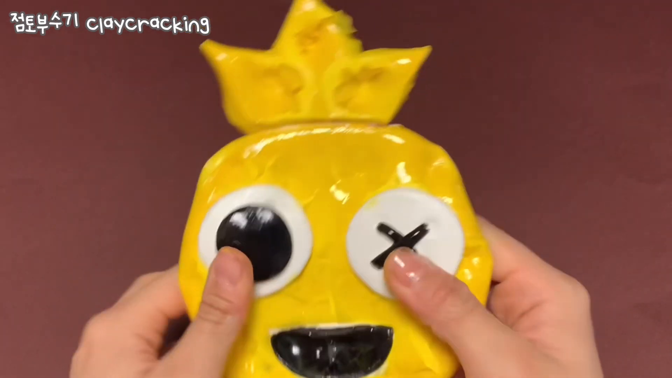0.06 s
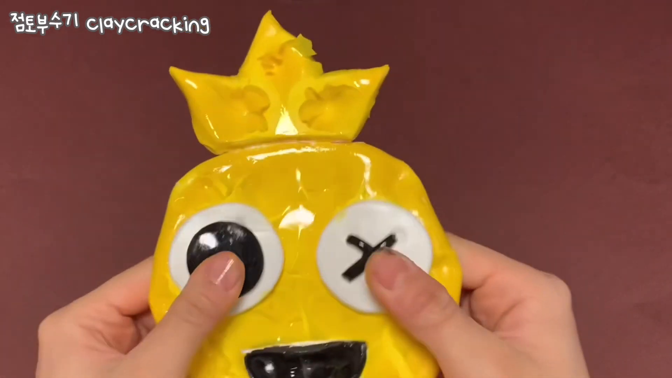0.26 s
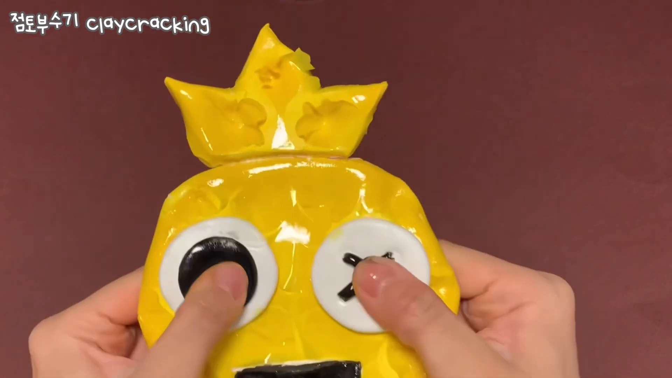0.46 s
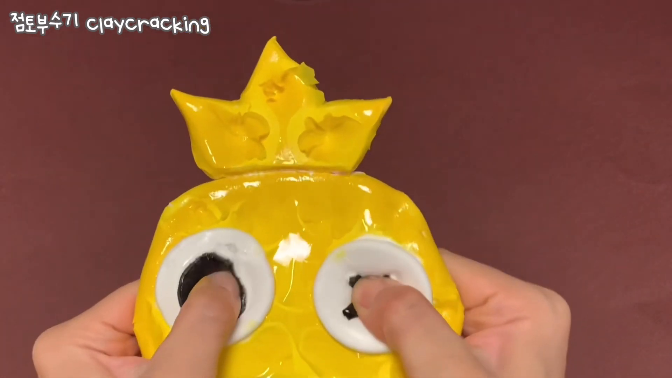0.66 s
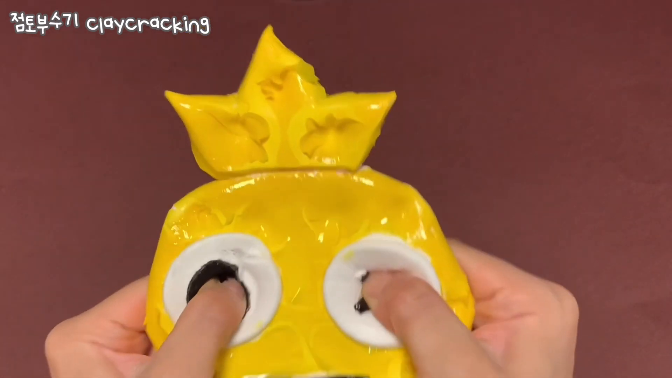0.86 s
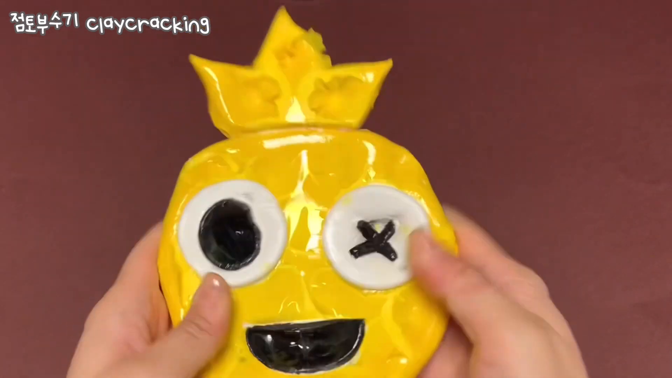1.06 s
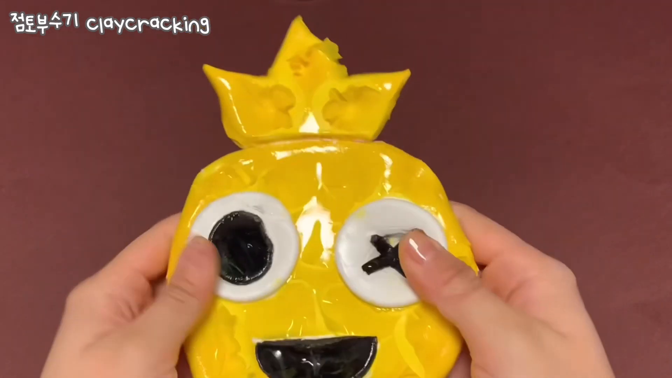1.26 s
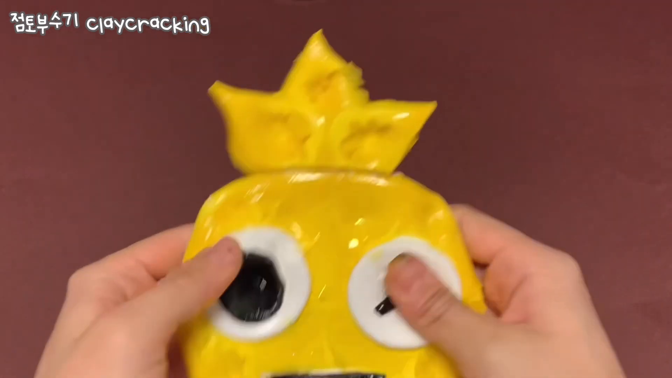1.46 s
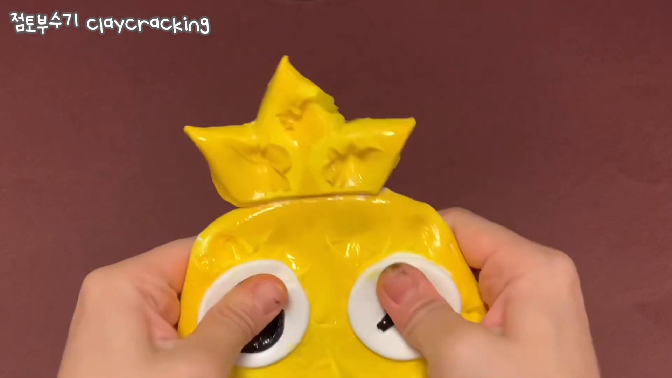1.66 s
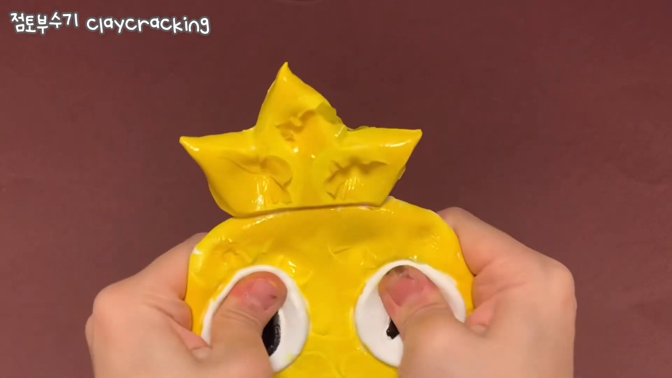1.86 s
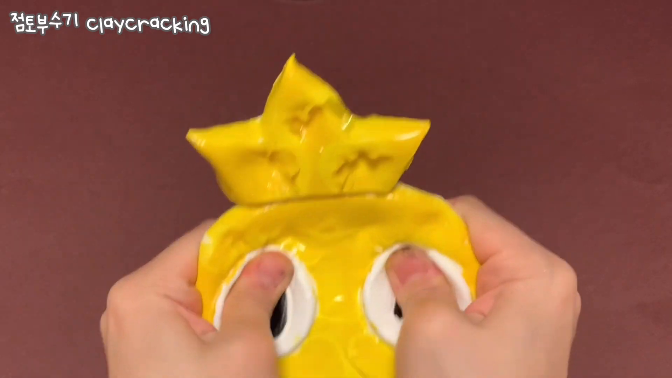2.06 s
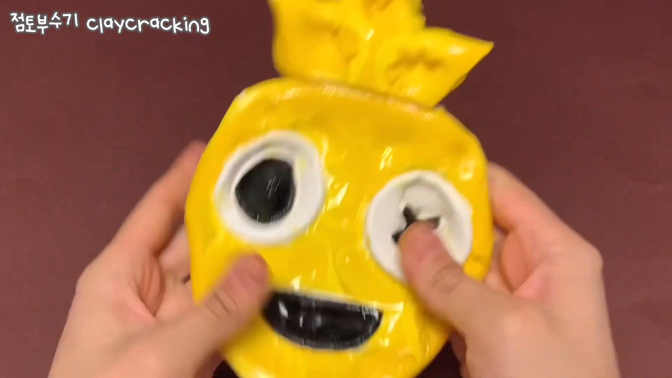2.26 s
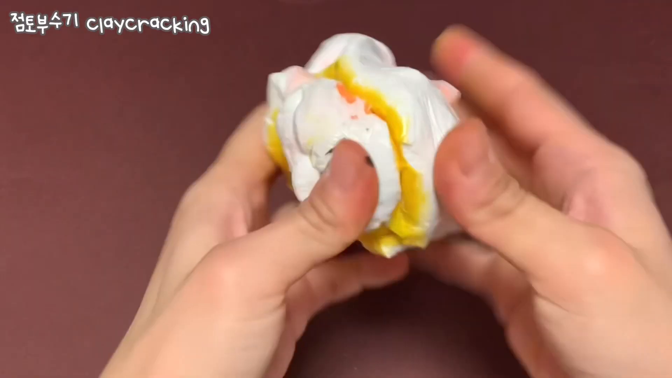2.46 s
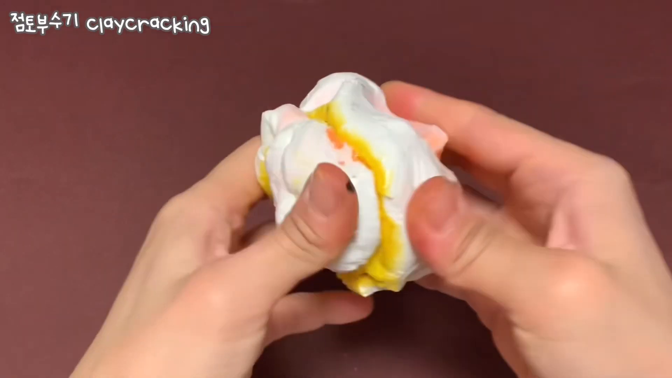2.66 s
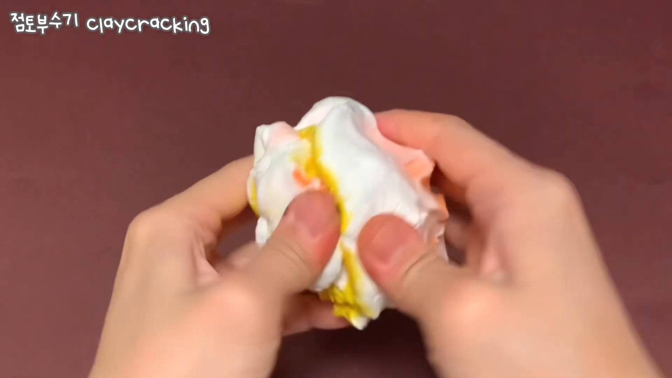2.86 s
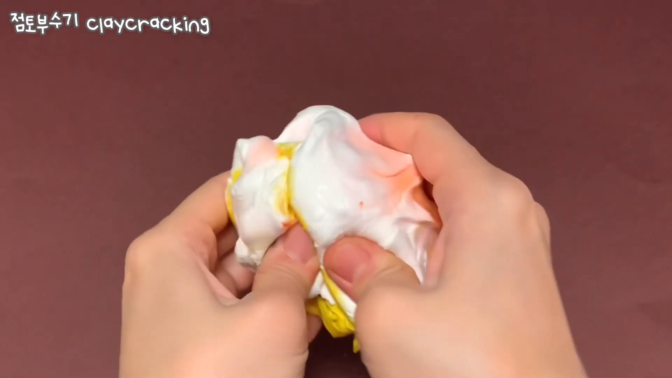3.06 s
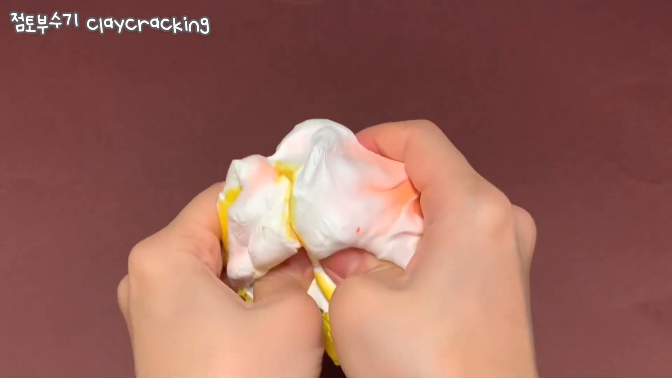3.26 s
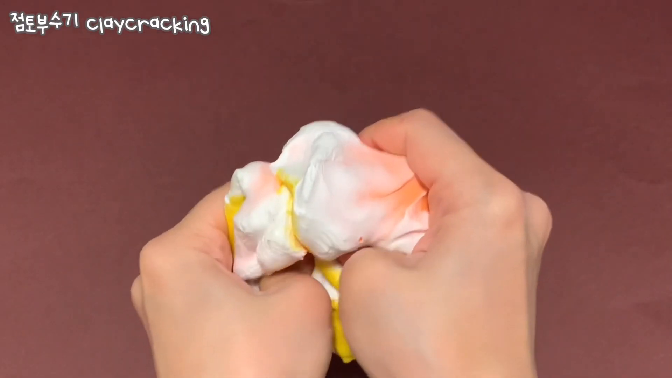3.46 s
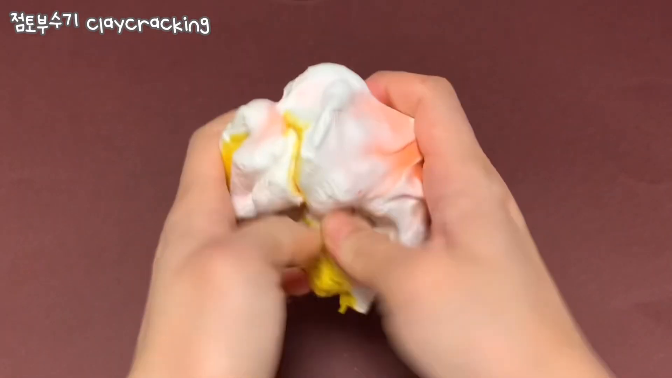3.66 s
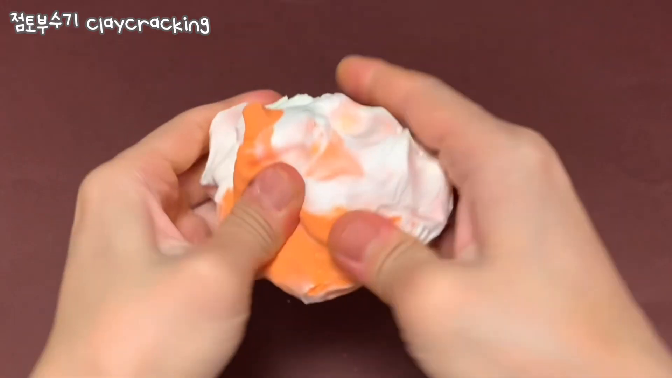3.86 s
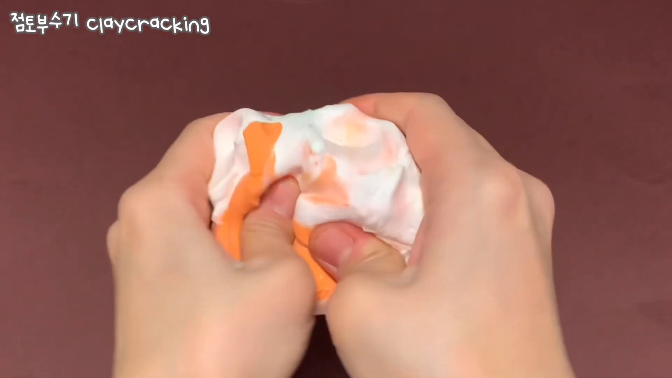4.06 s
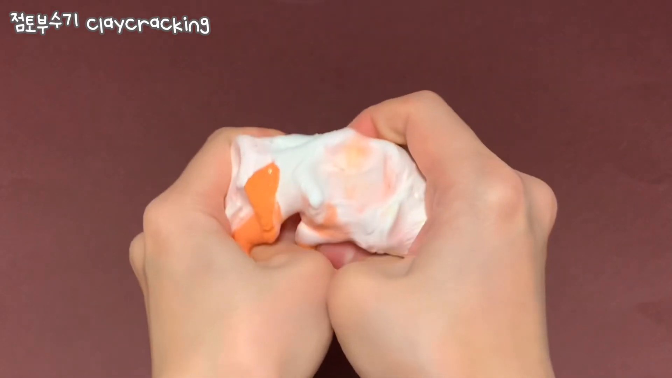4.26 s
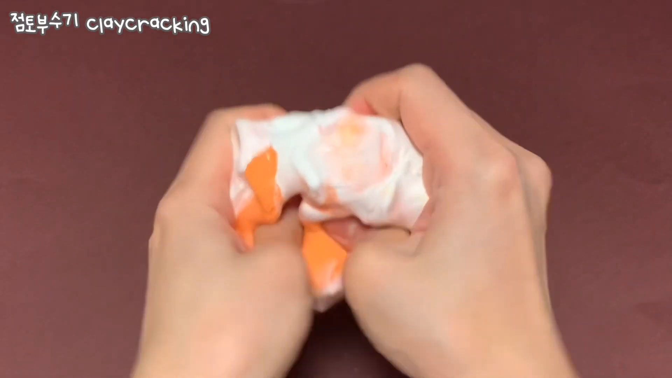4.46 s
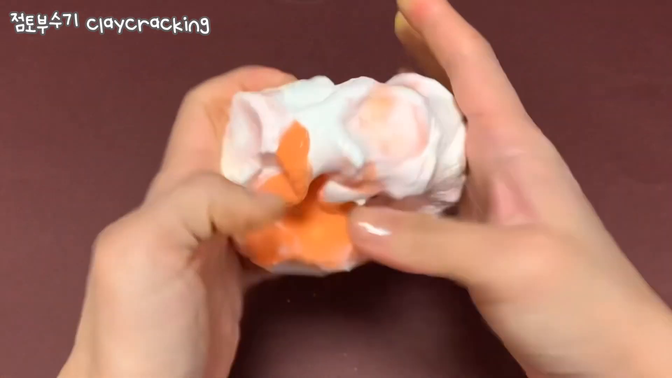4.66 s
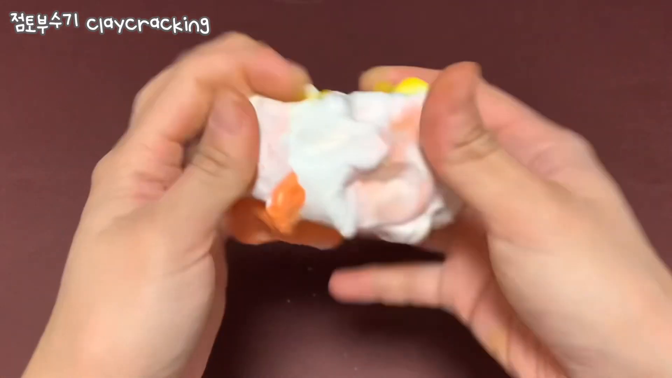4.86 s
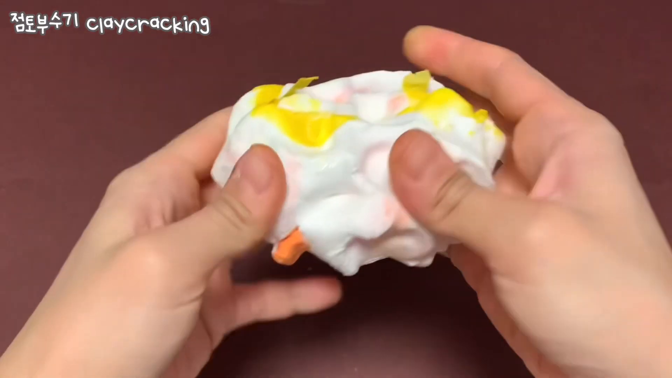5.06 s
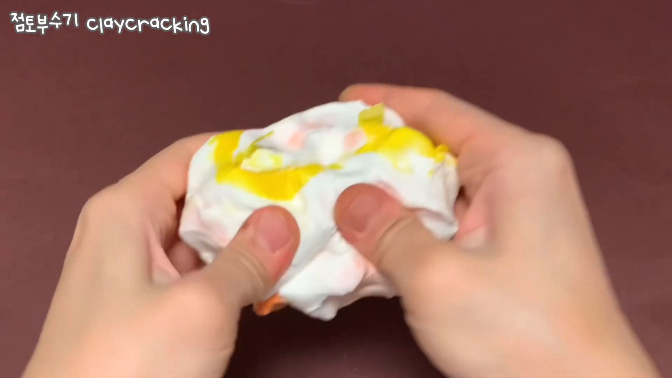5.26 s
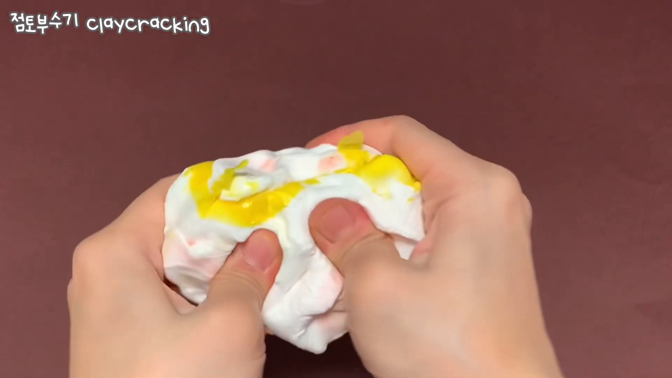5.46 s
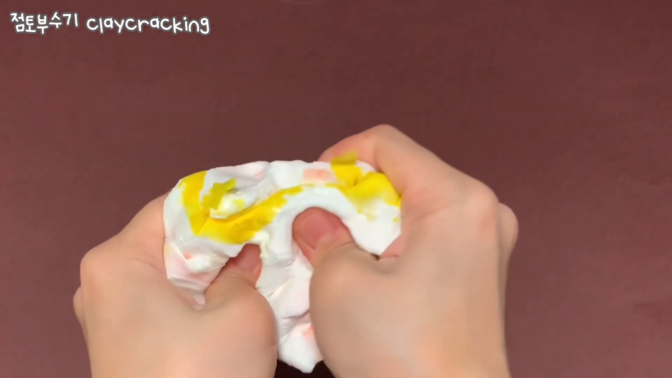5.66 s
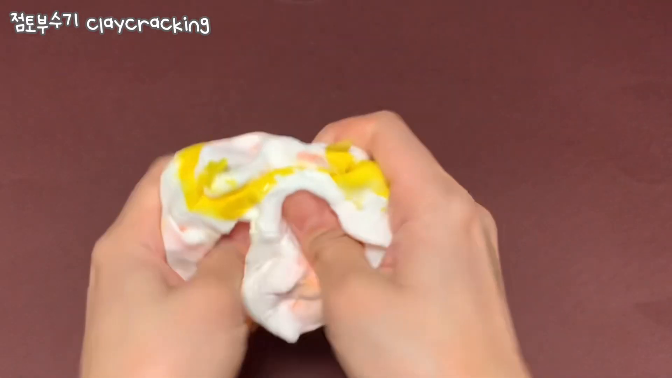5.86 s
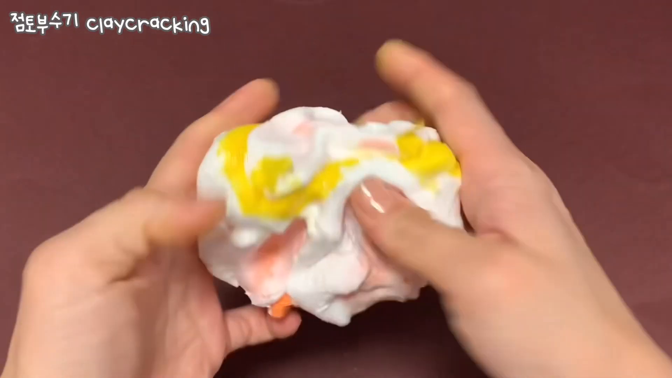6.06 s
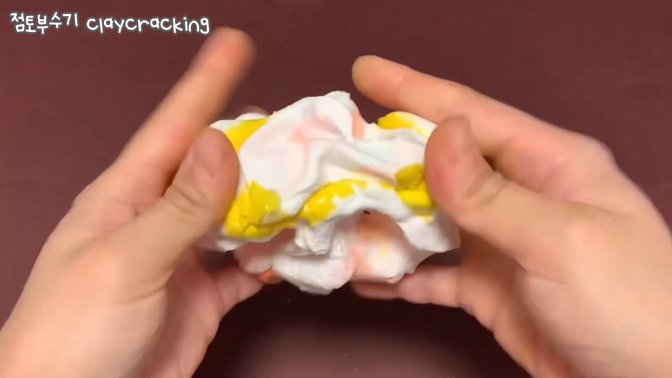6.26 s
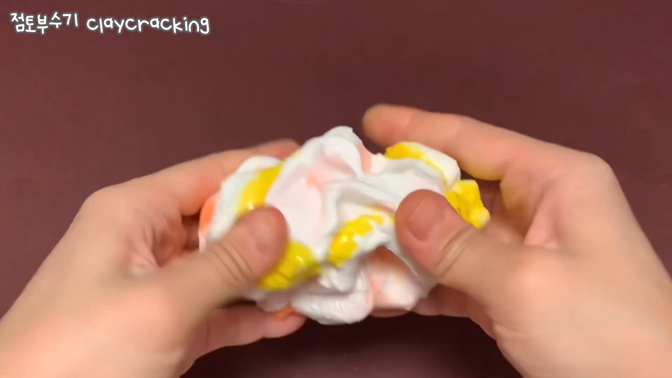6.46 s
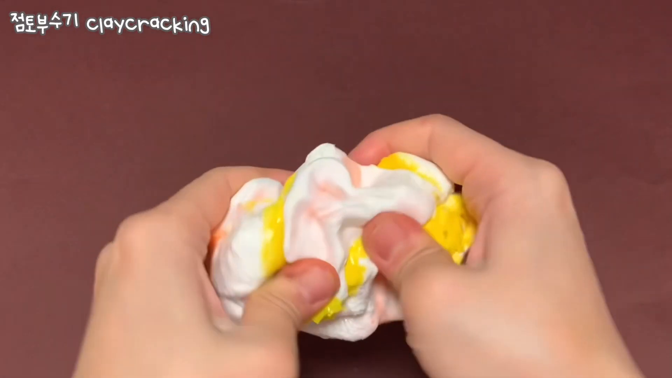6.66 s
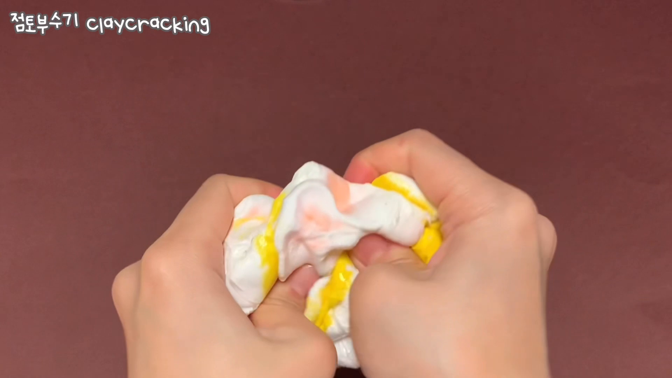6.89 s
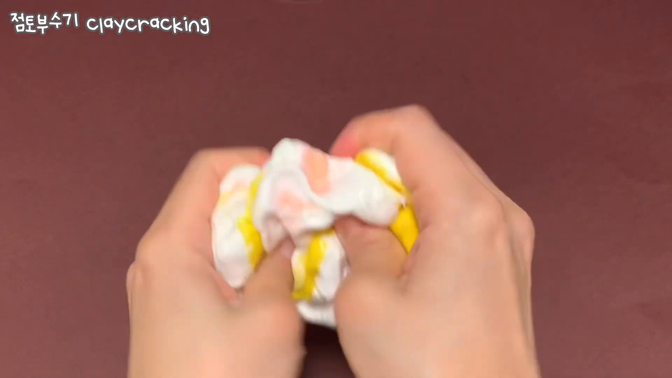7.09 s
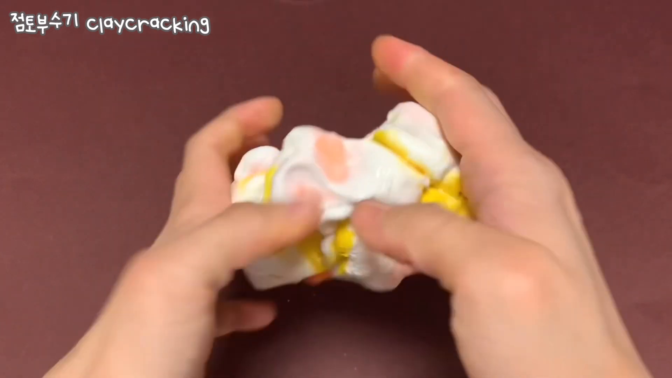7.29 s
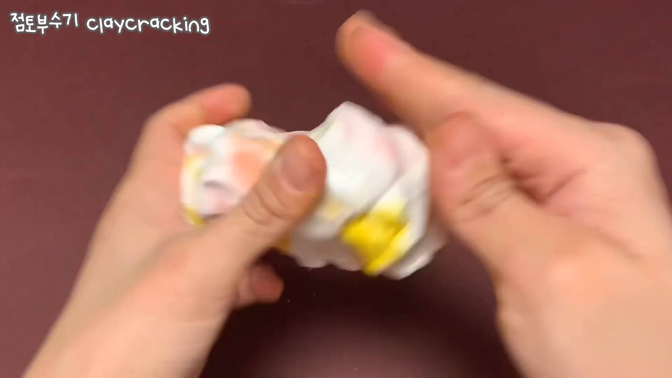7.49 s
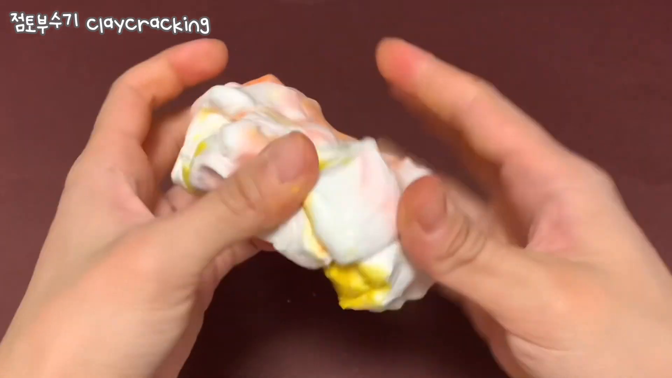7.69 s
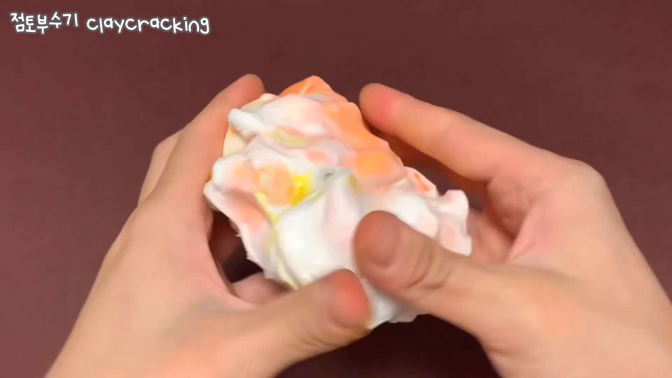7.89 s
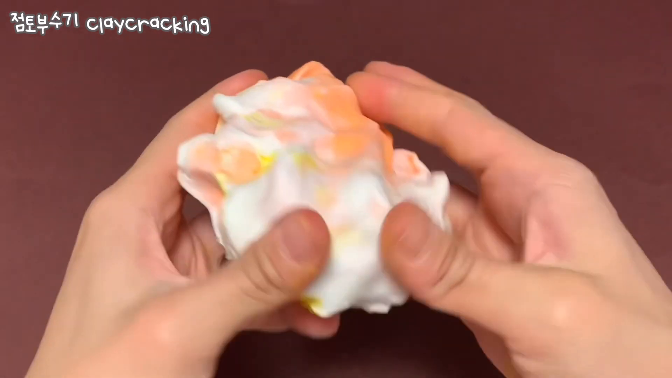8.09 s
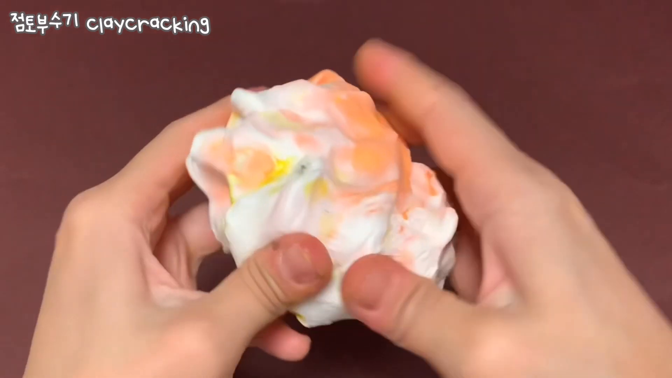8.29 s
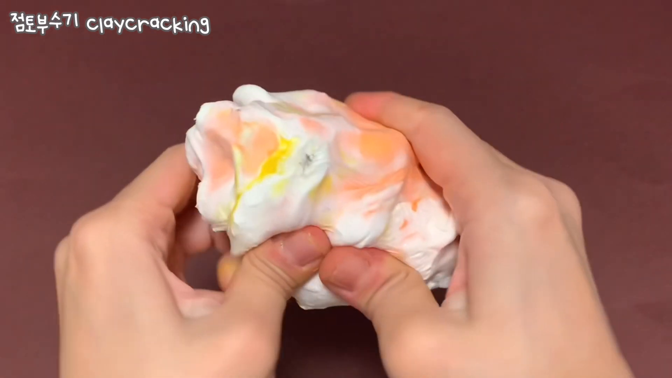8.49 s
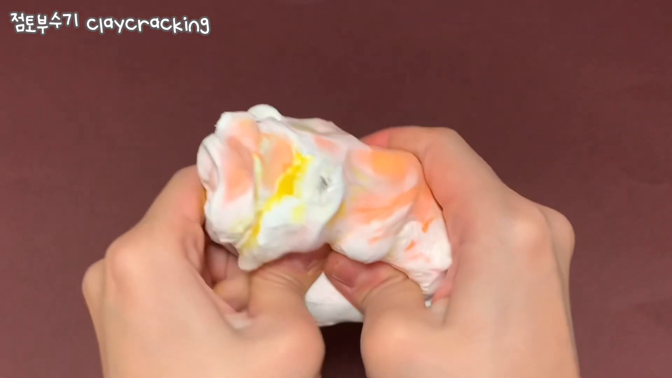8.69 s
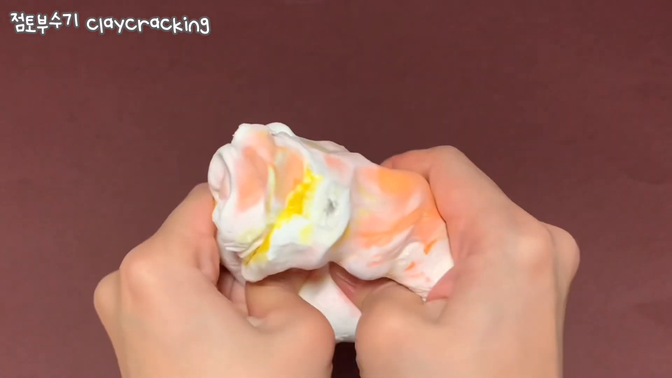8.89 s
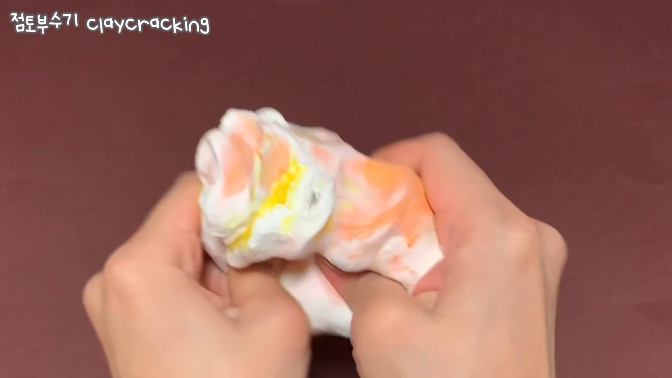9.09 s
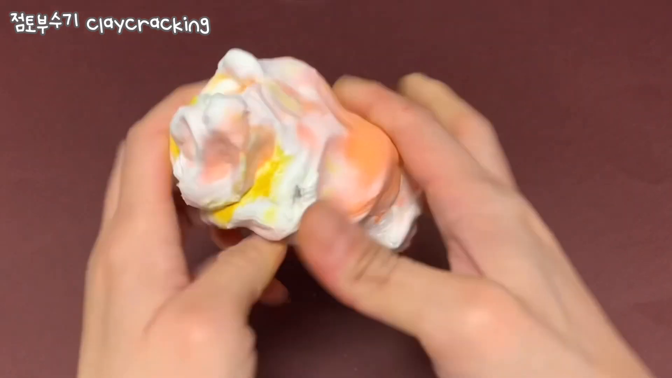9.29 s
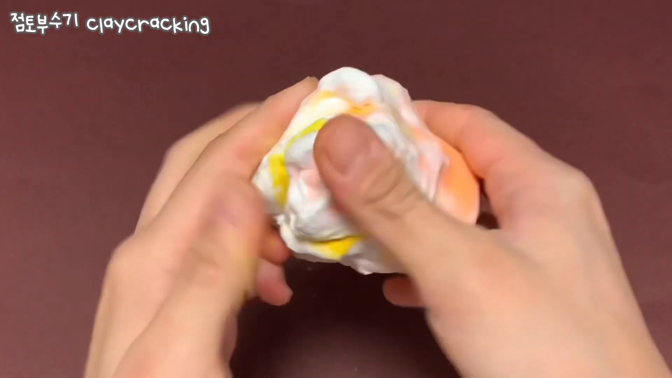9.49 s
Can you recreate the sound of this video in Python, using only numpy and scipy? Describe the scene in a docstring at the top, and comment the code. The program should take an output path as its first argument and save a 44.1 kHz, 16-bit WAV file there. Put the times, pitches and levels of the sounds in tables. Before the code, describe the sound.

Hands squeeze a lump of soft clay with a brittle dried skin, close to the microphone in a small, quiet room. Loud, sharp cracks over dense fine crackling come from about 0.4 to 1.1 seconds, and again from 1.7 until breaking off at 2.4, with soft finger bumps. A longer, heavier crunch runs from 2.8 seconds and cuts off at 3.7, the soft core squashing with a low rumble beneath it. More bursts follow around 4.1 and 4.5 seconds, then from 5.4 to 6.1. Light ticks lead to a short, strong crunch at 7.1 seconds, followed by a near-silent pause until about 8.1. A final run of snapping and crackling builds from 8.4 to 9.3 seconds and fades to faint ticks. The loudest cracks overload slightly, and each has a short room reflection.

```python
"""Squeezing crusted clay

Close microphone, small room: hands squeeze a lump of soft clay with a dried, brittle skin. The skin snaps
in loud cracks over a dense fine crackle, the soft core squashes with a low rumble, fingers bump the lump
and the walls answer. Twice the sound dips and breaks off. The loudest cracks overload the recorder."""
import sys
import numpy as np
from scipy import signal
from scipy.fft import rfft, irfft, next_fast_len
from scipy.io import wavfile
from scipy.ndimage import map_coordinates

SR = 44100
rng = np.random.default_rng(int(sys.argv[2]) if len(sys.argv) > 2 else 0)


def generate_wav(signal):
    """Clip the signal to [-1, 1] and save it as 16-bit WAV at the path in sys.argv[1]."""
    frames = np.transpose(np.atleast_2d(signal))
    scaled = np.clip(frames, -1, 1) * 32767
    pcm = np.round(scaled).astype(np.int16)
    wavfile.write(sys.argv[1], SR, pcm)


N = 420713

# Single breaks of the skin: t/s, level/dB, ring f/Hz
SKIN_CRACKS = [(0.1351, -28.5, 3300), (0.421, -19.5, 7080), (0.4423, 7.5, 4200), (0.454, 1.5, 2896),
               (0.479, 7, 7550), (0.4872, 2.5, 4370), (0.5045, 5.5, 5160), (0.5361, 9.5, 4560),
               (0.5628, 5, 2890), (0.5678, 10, 2560), (0.615, 7.5, 7600), (0.6838, 5, 7240),
               (0.6862, 4.5, 5060), (0.7178, 7.5, 5300), (0.9293, -7.5, 2350), (0.9627, -4.5, 2470),
               (0.986, 4.5, 3020), (0.99, 9, 2600), (1.017, -8, 3000), (1.0277, 9.5, 2650),
               (1.0642, -4.5, 3020), (1.105, -6, 2760), (1.235, -25, 2070), (1.706, -7, 3670),
               (1.751, -6.5, 4160), (1.7684, 9.5, 4930), (1.7803, 4.5, 5200), (1.7995, 4.5, 2430),
               (1.828, 0.5, 5110), (1.8347, 5, 2820), (1.842, 5, 7360), (1.851, 1.5, 2705),
               (1.8588, 12.5, 4260), (1.862, 1, 2460), (1.8844, 8.5, 2260), (1.897, 7, 3045),
               (1.924, 5.5, 3530), (1.9485, 9.5, 3320), (1.9548, -2.5, 3030), (2.088, -13, 3200),
               (2.108, 3.5, 4270), (2.128, -2.5, 2920), (2.143, 7, 4180), (2.1575, 3, 4160),
               (2.2143, -4, 6650), (2.2728, -0.5, 2830), (2.2883, -2, 2030), (2.3295, -6.5, 3430),
               (2.3518, -2, 2110), (2.539, -28, 1850), (2.7728, -14, 4160), (2.8154, -7.5, 4130),
               (2.9218, 13, 3050), (2.9795, 9.5, 8180), (2.9827, 4, 4290), (2.9999, 7, 6270),
               (3.021, 4.5, 7000), (3.0807, 4.5, 1850), (3.1157, 3, 4000), (3.1648, -9.5, 6740),
               (3.1768, -10.5, 2208), (3.1916, 0.5, 7760), (3.2292, 1.5, 5330), (3.2331, 3.5, 2700),
               (3.2569, 12, 3900), (3.303, 7, 3150), (3.328, 6, 6600), (3.341, -3.5, 8900),
               (3.387, -1, 6400), (3.511, -9.5, 9710), (3.526, 6.5, 2610), (3.5523, 9.5, 3880),
               (3.585, 11.5, 5400), (3.604, 9.5, 2590), (3.6312, 4.5, 4110), (3.636, 8, 3380),
               (3.664, 11.5, 9100), (3.8535, -10, 8460), (3.869, 1.5, 4100), (3.9092, -9, 4280),
               (3.958, -7, 4360), (3.9775, -21.5, 4150), (4.0334, 0.5, 5700), (4.0366, 0.5, 7160),
               (4.0497, 7, 3570), (4.0705, -1, 3960), (4.105, -11.5, 4170), (4.127, 3, 9250),
               (4.134, 0.5, 4610), (4.149, 5.5, 3500), (4.1648, 3.5, 7500), (4.1854, -1, 3900),
               (4.2081, -3.5, 3500), (4.2334, -1, 3600), (4.287, -5, 4800), (4.3868, -18, 10160),
               (4.4842, 3.5, 1380), (4.5841, -1, 1460), (4.7376, -9, 3060), (4.982, -26, 2010),
               (5.208, -19, 3080), (5.268, -25, 3110), (5.4186, -9, 4340), (5.4404, -13, 4130),
               (5.4556, 2.5, 4320), (5.4873, -5, 3070), (5.492, -4.5, 3150), (5.5066, 4, 7900),
               (5.515, -0.5, 3930), (5.5765, 7, 4170), (5.597, 10, 3380), (5.6603, -7.5, 7600),
               (5.7776, -10, 7360), (5.8448, 7, 4010), (5.8504, -2, 4800), (5.905, 9, 1260),
               (5.9144, 13, 3870), (5.9346, 7, 4030), (6.0257, 8.5, 2400), (6.1653, -9.5, 1900),
               (6.22, -18, 2500), (6.44, -20, 3080), (6.504, -20, 4680), (6.5717, -24, 3700),
               (6.6547, -11, 5200), (6.798, -7, 3800), (6.907, -12, 5140), (7.088, -5, 4180),
               (7.114, 8.5, 3870), (7.119, 10, 2880), (7.1521, 0, 1620), (7.1822, 1.5, 5640),
               (7.1957, 4.5, 2480), (7.579, -29, 1446), (7.96, -26, 1587), (8.144, -11.5, 4200),
               (8.2685, -14, 2010), (8.3544, -10.5, 4730), (8.3593, -6, 8700), (8.406, -13, 4260),
               (8.4587, -1, 4070), (8.5097, -3.5, 4400), (8.5189, -4.5, 4500), (8.525, 5, 4300),
               (8.5344, 0.5, 4300), (8.6103, 8.5, 4200), (8.6342, 0, 4500), (8.6434, 2, 9100),
               (8.659, 7.5, 5230), (8.6761, 7.5, 6600), (8.727, -8, 4820), (8.753, 3, 4560),
               (8.779, -1.5, 7300), (8.802, 1, 8300), (8.806, 5.5, 1950), (8.8289, 2.5, 1880),
               (8.8346, 4, 5900), (8.8687, -8, 2070), (8.877, -10, 2570), (8.9051, -3.5, 5900),
               (8.978, -17.5, 8550), (9.072, -17.5, 2900), (9.1279, 4.5, 2610), (9.1405, 9.5, 3580),
               (9.187, 9, 3670), (9.198, -12.5, 4100), (9.2198, -9, 3600), (9.2714, -1, 4760),
               (9.336, -15.5, 3580), (9.5368, -14, 1290)]
# Finger squeezes: full pressure t/s, build-up/s, hold/s, crackle/dB, squash/dB, skin ring f/Hz,
# knock/dB (thick flakes knock the core), treble/dB
FINGER_SQUEEZES = [(0, 0.029, .12, -51.5, -42.5, 2015, -0.5, -20.5),
                   (0.45, 0.034, 0.18, -21, -57, 4390, -18.5, -10),
                   (0.685, .04, 0.035, -14, -55.5, 4275, -16.5, -16),
                   (0.933, 0.042, 0.043, -23.5, -34, 2678, -19.5, -11),
                   (1.22, .2, 0.22, -55, -65, 2544, -21, -11),
                   (1.708, .01, 0.034, -43, -46.5, 3635, -25.5, -7),
                   (1.778, 0.023, 0.15, -19.5, -51.5, 3700, -15, -7.5),
                   (2.1, 0.04, 0.021, -18, -33, 3477, -12, -15),
                   (2.232, 0.14, 0.21, -37.5, -37, 2916, -10, -16.5),
                   (2.772, .02, 0.039, -31, -45, 3697, -14, -12),
                   (2.925, .01, 0.082, -19, -41.5, 3740, -11, -10),
                   (3.08, .1, .12, -26.5, -47, 3724, -15, -14),
                   (3.265, 0.072, 0.033, -12, -39.5, 3720, -14.5, -9),
                   (3.547, 0.086, 0.1, -10.5, -27, 3120, -8.5, -17),
                   (3.861, .025, 0.12, -39.5, -46, 4000, -15.5, -12),
                   (4.046, 0.034, 0.18, -30.5, -49, 4220, -15, -2),
                   (4.479, 0.07, 0.043, -12.5, -27.5, 2898, -6.5, -7),
                   (4.787, .3, 0.022, -37.5, -43.5, 2724, -4.5, -11.5),
                   (5.46, 0.048, 0.057, -30.5, -53, 4110, -19, -18),
                   (5.584, .05, 0.0071, -26.5, -46, 3924, -16, -13),
                   (5.777, .15, 0.039, -40.5, -51, 3550, -15, -14.5),
                   (5.843, 0.012, 0.033, -14.5, -34.5, 3477, -5, -20.5),
                   (6.005, 0.1, 0.016, -21.5, -39.5, 2284, -2.5, -24.5),
                   (6.654, 0.015, .02, -46.5, -47, 2996, -18.5, -15.5),
                   (6.804, .02, 0.026, -42, -58, 3040, -25.5, -18.5),
                   (6.91, 0.014, 0.019, -46.5, -44.5, 3540, -23.5, -18),
                   (7.113, 0.11, 0.056, -16.5, -31, 3046, -9, -18.5),
                   (8.14, 0.0092, 0.12, -48, -46, 3000, -10, -18),
                   (8.329, 0.057, .08, -43.5, -42, 4390, -6, -5),
                   (8.515, .1, 0.035, -32.5, -51, 4260, -19, -10),
                   (8.674, .1, 0.01, -23.5, -53, 3774, -14, -15),
                   (8.807, 0.043, 0.12, -42, -51, 3594, -19, -17.5),
                   (9.134, 0.055, 0.037, -12.5, -32.5, 3488, -10.5, -17.5),
                   (9.226, .05, 0.0086, -23.5, -39.5, 3830, -8, -14.5)]
# Spectrum of the squashing core: f/Hz, relative level/dB
CORE_SPECTRUM = [(20, -32.5), (30, -5), (85, -2.5), (150, -6.5), (400, -17.5), (900, -35)]
# Fingers bumping the lump: t/s, level/dB, f/Hz, t60/s
FINGER_BUMPS = [(1.51, -29.5, 89.1, .25), (2.155, -22, 54, 0.14), (2.229, -30.5, 90, 0.38),
                (2.336, -24.5, 95, 0.16), (2.812, -23.5, 276, 0.035), (4.769, -32, 59.1, 0.13),
                (4.982, -23, 73, .08)]
# Decay of the small room: f/Hz, t60/s
ROOM_DECAY = [(300, 0.7), (2000, 0.26), (6000, 0.25), (15000, 0.25)]
# Spectrum of the room tone: f/Hz, relative level/dB
ROOM_TONE_SPECTRUM = [(20, -23), (60, -2), (125, -9), (190, -19.5), (255, 1), (340, -18.5), (600, -22),
                      (1600, -25.5), (16000, -59)]
# Moments when squeeze and reverberation break off: t/s
CUTOFFS = [2.421, 3.742]

BUILD_DB = 40  # gained over a squeeze's build-up
CRACKLE_FALL_DB_PER_S, SQUASH_FALL_DB_PER_S = 238.5, 163  # as the fingers let go
SETTLE_DB, SETTLE_DB_PER_S = -35, 46  # the crushed skin keeps ticking faintly after a squeeze
SQUASH_LAG_S, SQUASH_BUILD_S = 0.036, 0.039  # the core yields later and more slowly than the skin
REST_CRACKLE_DB, REST_SQUASH_DB = -60, -55  # the lump merely held
REST_RING_HZ, REST_KNOCK_DB, REST_TREBLE_DB = 1700, -10.5, -21
HOLLOW_DB, HOLLOW_Q = -13, 4.7  # the hollow under the skin rings with every snap
FLAKE_Q, TREBLE_SCATTER_DB, CLUMP_DB = 3.7, 5, 2.6
DIP_S, DIP_DB = 0.0622, 11  # the level sinks just ahead of each cutoff
ROOM_DB, TOP_HZ = -13, 16320


def cracks():
    """The loud single breaks of the skin; the strongest run furthest and tear longest."""
    at_s, db, ring_hz = np.transpose(SKIN_CRACKS)
    tear_s = np.minimum(0.00034 + 0.00014 * amp(db), .001)
    return snaps(at_s, db, ring_hz, tear_s, width_hz=ring_hz[:, None] / FLAKE_Q)


def snaps(at_s, db, ring_hz, tear_s, width_hz):
    """The skin tears in short bursts of noise; each rings its flake and knocks the core."""
    t = np.arange(512) / SR
    age = t / tear_s[:, None]
    tear = rng.standard_normal(age.shape) * age * np.exp(1 - age)
    start = np.round(at_s * SR).astype(int)
    _, skin_hz, knock_db, treble_db = (v[np.minimum(start, N - 1), None] for v in skin())
    jf = 1j * np.fft.rfftfreq(len(t), 1 / SR)

    def ring(hz, width):
        return jf * width / (hz ** 2 + jf ** 2 + jf * width)

    lower_hz = ring_hz[:, None]
    upper_hz = lower_hz * (1.3 + rng.random(lower_hz.shape))  # an uneven flake has a second ring
    flake = ring(lower_hz, width_hz) - 0.49 * ring(upper_hz, width_hz)
    hollow = amp(HOLLOW_DB) * ring(skin_hz, skin_hz / HOLLOW_Q)
    crunch = amp(-9) / (1 + jf / (3 * skin_hz)) ** 2
    sizzle_db = treble_db + TREBLE_SCATTER_DB * rng.standard_normal(skin_hz.shape)
    sizzle = amp(sizzle_db) * (jf / (7000 + jf)) ** 3
    corner_hz = 1050 * amp(-.28 * knock_db)  # a thin flake radiates no bass
    low_cut = (jf ** 2 / (corner_hz ** 2 + jf ** 2 + 0.96 * corner_hz * jf)) ** 2
    knock = 0.64 * amp(knock_db) * jf / (250 + jf) / (1 + jf / 1600) ** 2
    burst = irfft(rfft(tear) * ((flake + hollow + crunch) * low_cut + sizzle + knock))
    burst *= (amp(db) / np.abs(burst).max(axis=1))[:, None]
    samples = start[:, None] + np.arange(len(t))
    return np.bincount(samples.ravel(), burst.ravel(), N + SR)[:N]


def crackle():
    """Sparse middling breaks over countless tiny ones, clumped in time."""
    level_db, _, knock_db, _ = skin()
    middling = grains(count=1300, spread_db=6.5, tear_s=.00028)
    tiny = grains(count=7000, spread_db=1.5, tear_s=0.0015)
    firmness = np.clip((level_db + 80) / 40, .3, .8)  # a light touch only rustles
    thinness = amp(-knock_db / 2 - 5)  # thin skin snaps apart
    return amp(level_db + CLUMP_DB * wobble(40)) * (firmness * thinness * middling + tiny)


def grains(count, spread_db, tear_s):
    """Small breaks at random moments, a few stronger than the rest, at rms 1."""
    at_s = rng.random(count) * (N - 1) / SR
    db = np.minimum(spread_db * rng.exponential(size=count), 14)
    skin_hz = skin()[1][(at_s * SR).astype(int)]
    ring_hz = np.clip(skin_hz * np.exp(0.49 * rng.standard_normal(count)), 900, 13000)
    return unit(snaps(at_s, db, ring_hz, np.full(count, tear_s), width_hz=1613))


def skin():
    """Crackle/dB, ring f/Hz, knock/dB and treble/dB per sample; the strongest squeeze leads the timbre."""
    full_s, build_s, hold_s, db, _, *timbre = np.transpose(FINGER_SQUEEZES)
    t, pressed = pressure(full_s, build_s, hold_s, db, CRACKLE_FALL_DB_PER_S)
    _, settling = pressure(full_s, build_s, hold_s, db + SETTLE_DB, SETTLE_DB_PER_S)
    power, rest = pressed + settling, amp(2 * REST_CRACKLE_DB)
    total = power.sum(axis=0) + rest
    rest_timbre = REST_RING_HZ, REST_KNOCK_DB, REST_TREBLE_DB
    blend = [(v @ power + held * rest) / total for v, held in zip(timbre, rest_timbre)]
    return [np.interp(np.arange(N) / SR, t, v) for v in (10 * np.log10(total), *blend)]


def pressure(full_s, build_s, hold_s, db, fall_db_per_s):
    """Power of each squeeze, every millisecond: build-up, hold, release; a cutoff ends it."""
    t = np.arange(0, N / SR + .002, .001)
    since = t - full_s[:, None]
    lost_db = np.maximum(-BUILD_DB * since / build_s[:, None], fall_db_per_s * (since - hold_s[:, None]))
    sounding = np.searchsorted(CUTOFFS, t) <= np.searchsorted(CUTOFFS, full_s)[:, None]
    return t, amp(2 * (db[:, None] - np.maximum(lost_db, 0))) * sounding


def squash():
    """The soft core yields with an uneven low rumble."""
    full_s, build_s, hold_s, _, db, *_ = np.transpose(FINGER_SQUEEZES)
    t, power = pressure(full_s + SQUASH_LAG_S, build_s + SQUASH_BUILD_S, hold_s, db, SQUASH_FALL_DB_PER_S)
    gain = np.sqrt(np.interp(np.arange(N) / SR, t, power.sum(axis=0)) + amp(2 * REST_SQUASH_DB))
    return gain * amp(3.7 * wobble(25)) * coloured_noise(CORE_SPECTRUM)


def bumps():
    """Each bump of a finger sets the whole lump swinging for a few cycles."""
    out, t = np.zeros(N + SR), np.arange(SR // 2) / SR
    for at_s, db, hz, t60 in FINGER_BUMPS:
        envelope = amp(db + 4.5 - 60 * t / t60) * (1 - np.exp(-2 * hz * t))
        out[round(at_s * SR):][:len(t)] += envelope * np.sin(2 * np.pi * hz * t)
    return out[:N]


def room(x, pieces=32):
    """The near walls answer, each frequency dying at its own speed; a cutoff stops the tail short."""
    out = np.zeros(N)
    cutoffs = np.round(np.array(CUTOFFS) * SR).astype(int)
    edges = np.union1d(np.linspace(0, N, pieces + 1).astype(int), cutoffs)
    f, t60 = np.transpose(ROOM_DECAY)
    for a, b in zip(edges[:-1], edges[1:]):
        hz, t, noise = signal.stft(rng.standard_normal(SR // 2), SR, nperseg=256)
        decay = amp(-60 * t / np.interp(hz, f, t60)[:, None])
        tail = signal.istft(noise * decay, SR, nperseg=256)[1]
        tail *= 1 - np.exp(-np.arange(len(tail)) / (0.00052 * SR))  # the walls take a moment to answer
        end = min([N, *cutoffs[cutoffs > a]])
        wet = signal.fftconvolve(x[a:b], tail / np.linalg.norm(tail))[:end - a]
        out[a:a + len(wet)] += wet
    return out


def room_tone():
    """The faint, steady low noise of the room behind the hands."""
    return amp(-50.5) * coloured_noise(ROOM_TONE_SPECTRUM)


def suppress(x, open_db, depth_db, smooth_s):
    """The noise suppressor turns everything down whenever the treble has been quiet for a while."""
    treble = signal.sosfilt(signal.butter(2, 900, "high", fs=SR, output="sos"), x)
    keep = np.exp(-1 / (smooth_s * SR))
    treble_db = 10 * np.log10(signal.lfilter([1 - keep], [1, -keep], treble ** 2) + 1e-9)
    return x * amp(np.clip(0.66 * (treble_db - open_db), -depth_db, 0))


def coloured_noise(points):
    """Noise with a spectrum of (f/Hz, level/dB) points on a log axis, at rms 1."""
    f, db = np.transpose(points)
    size = next_fast_len(N + 8192)
    hz = np.fft.rfftfreq(size, 1 / SR)
    gain = amp(np.interp(np.log(hz + 1), np.log(f + 1), db))
    return unit(irfft(rfft(rng.standard_normal(N), size) * gain, size)[:N])


def wobble(rate):
    """A smooth random curve, rate knots a second."""
    return map_coordinates(rng.standard_normal(int(N * rate / SR) + 4), [np.arange(N) * rate / SR])


def amp(db):
    return 10 ** (np.asarray(db) / 20)


def unit(x):
    return x / np.sqrt(np.mean(x ** 2) + 1e-20)


def scene():
    """At one microphone: the clay up close, the room well behind it."""
    loud, fine, tone = cracks(), crackle(), room_tone()
    clay = loud + fine + amp(ROOM_DB) * room(loud + 1.1 * fine) + squash()
    until_cutoff_s = np.array(CUTOFFS)[:, None] - np.arange(N) / SR
    dips = np.clip(1 - until_cutoff_s / DIP_S, 0, 1) * (until_cutoff_s > 0)
    return (amp(-DIP_DB * dips.sum(axis=0)) * clay + bumps() + tone)[None]


def record(dry):
    """The input overloads at full scale and passes the suppressor; the top rolls off at the band limit."""
    clipped = dry / (1 + np.abs(dry) ** 8) ** (1 / 8)
    gated = suppress(clipped, open_db=-33.5, depth_db=10.0, smooth_s=0.049)
    size = next_fast_len(N + 8192)
    roll_off = np.clip((TOP_HZ - np.fft.rfftfreq(size, 1 / SR)) / 550, 0, 1) ** 2
    return irfft(rfft(gated, size) * roll_off, size)[:, :N]


dry = scene()
out = record(dry)
generate_wav(out)
```